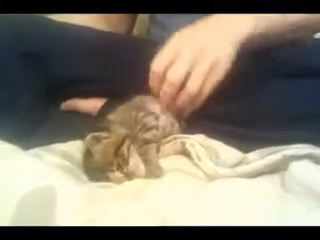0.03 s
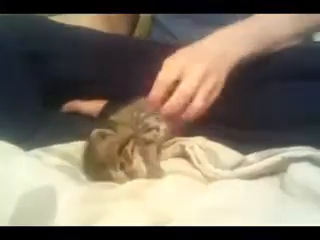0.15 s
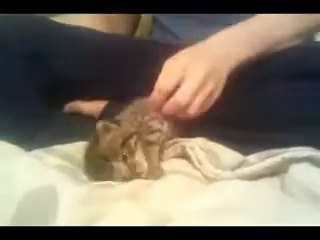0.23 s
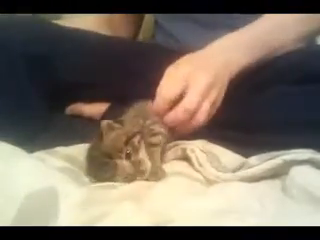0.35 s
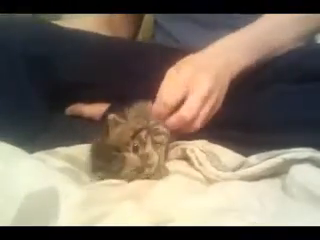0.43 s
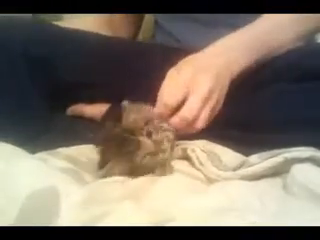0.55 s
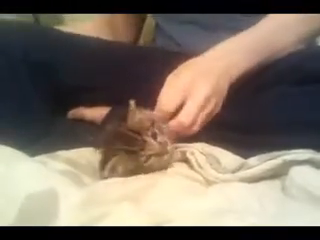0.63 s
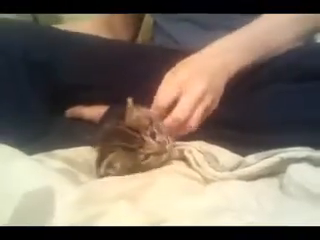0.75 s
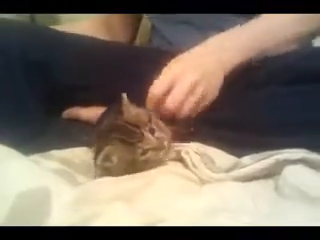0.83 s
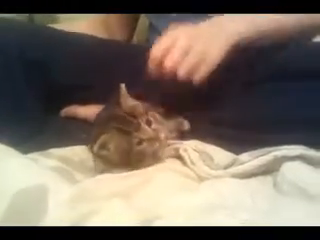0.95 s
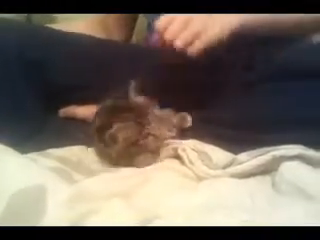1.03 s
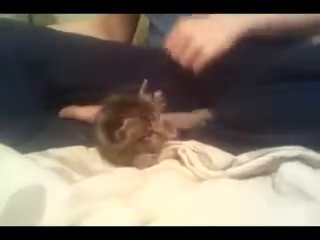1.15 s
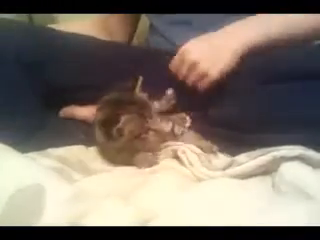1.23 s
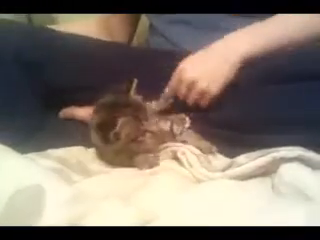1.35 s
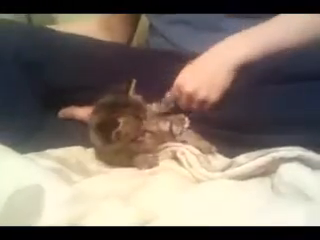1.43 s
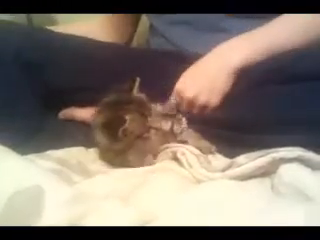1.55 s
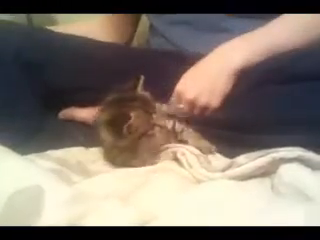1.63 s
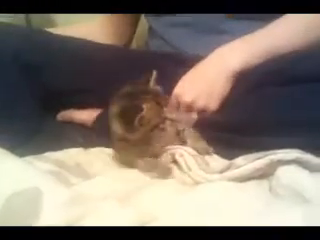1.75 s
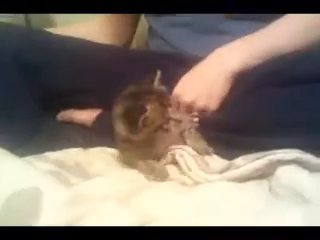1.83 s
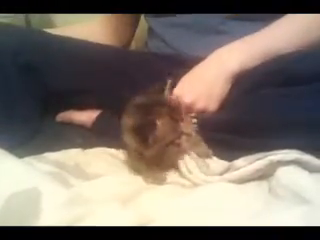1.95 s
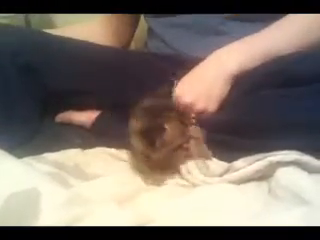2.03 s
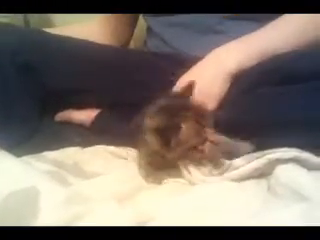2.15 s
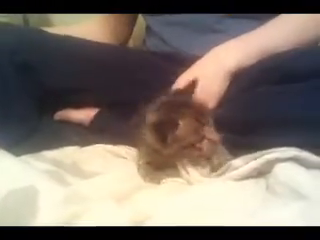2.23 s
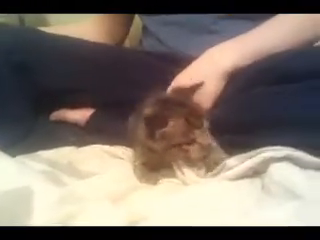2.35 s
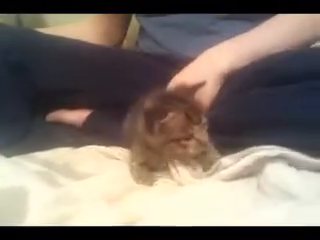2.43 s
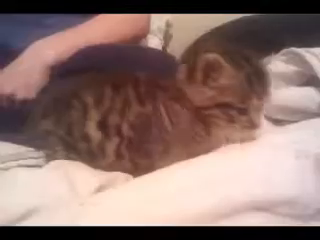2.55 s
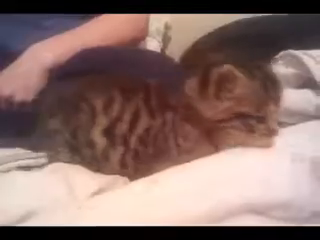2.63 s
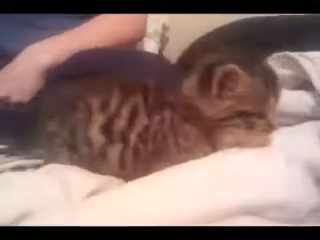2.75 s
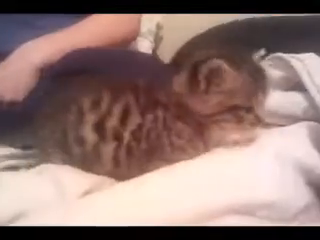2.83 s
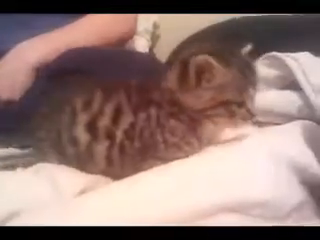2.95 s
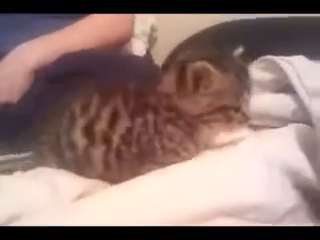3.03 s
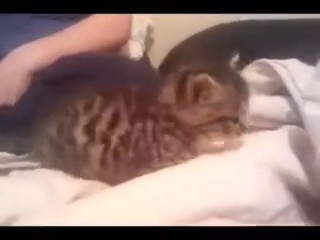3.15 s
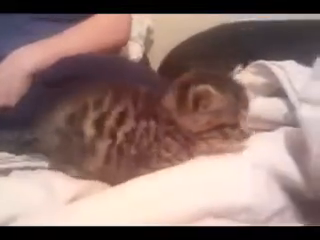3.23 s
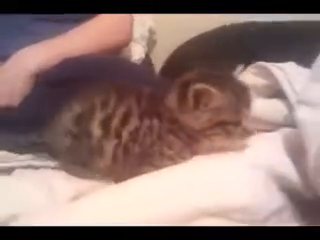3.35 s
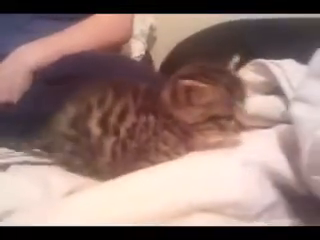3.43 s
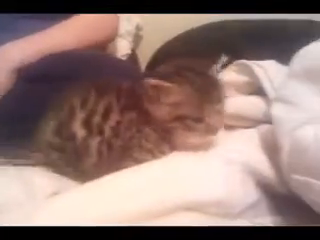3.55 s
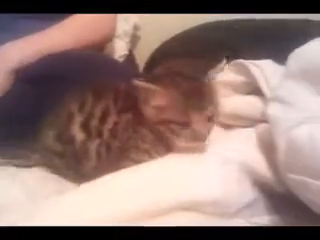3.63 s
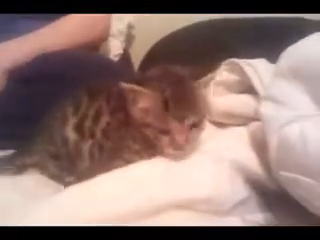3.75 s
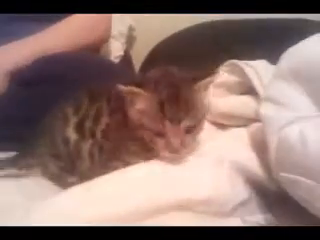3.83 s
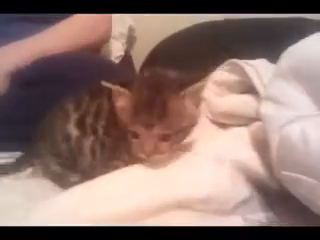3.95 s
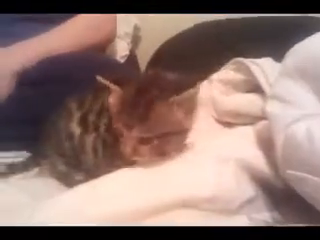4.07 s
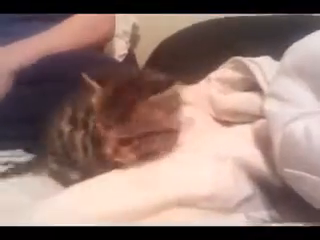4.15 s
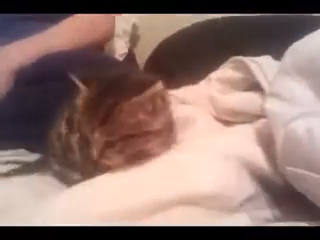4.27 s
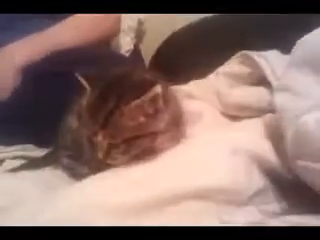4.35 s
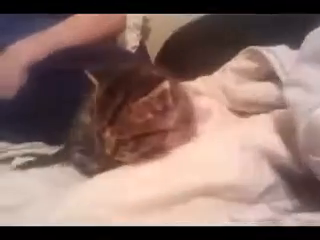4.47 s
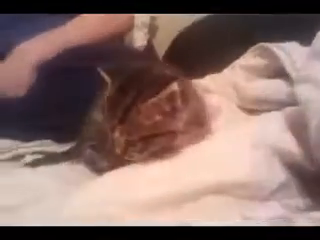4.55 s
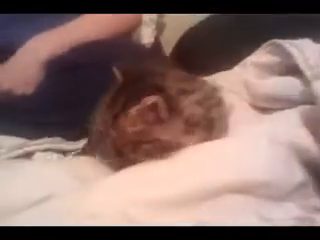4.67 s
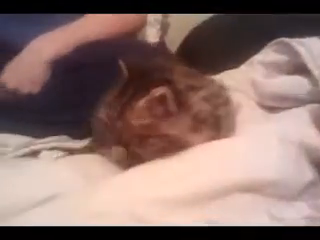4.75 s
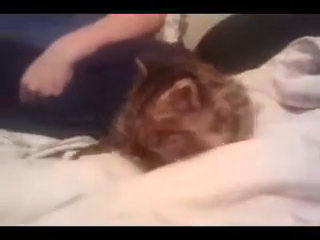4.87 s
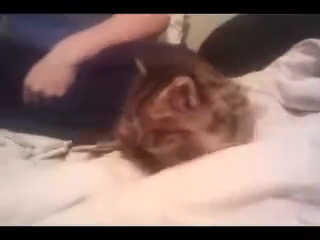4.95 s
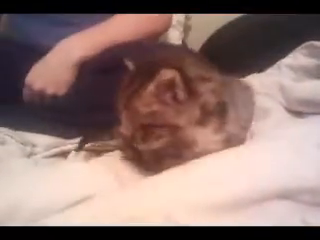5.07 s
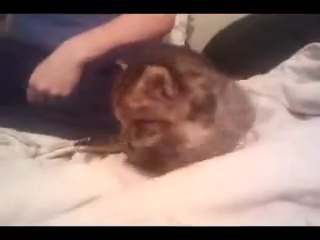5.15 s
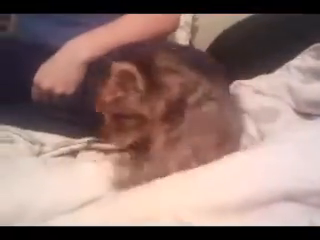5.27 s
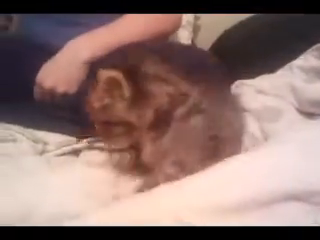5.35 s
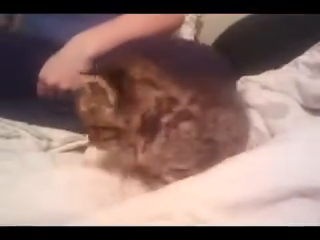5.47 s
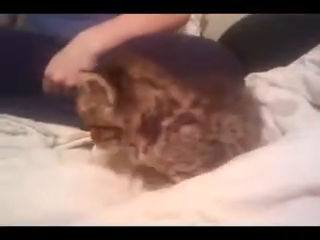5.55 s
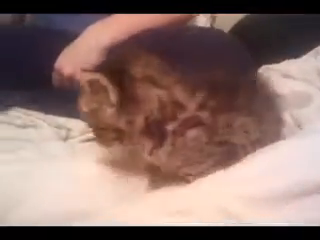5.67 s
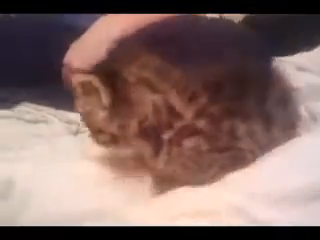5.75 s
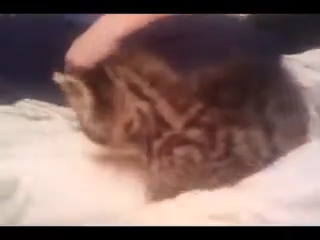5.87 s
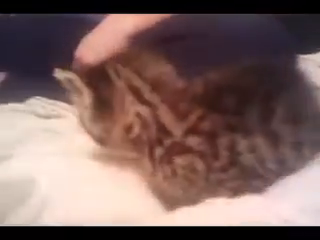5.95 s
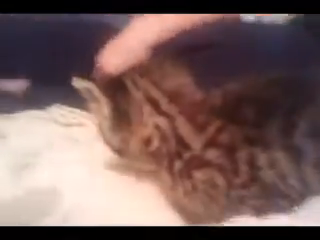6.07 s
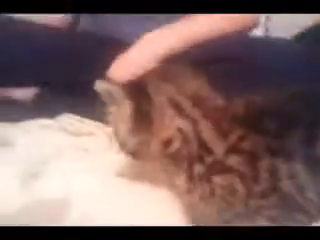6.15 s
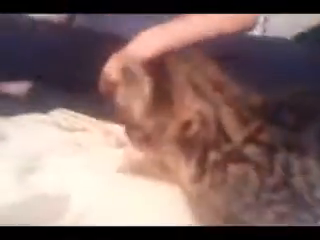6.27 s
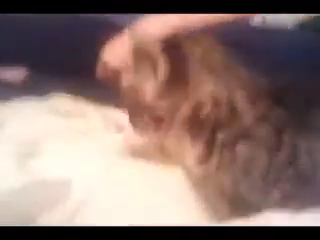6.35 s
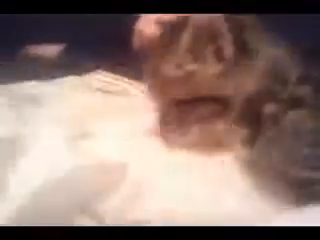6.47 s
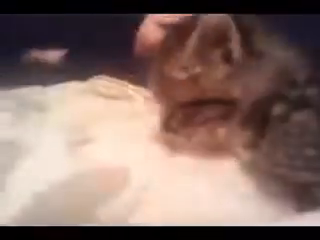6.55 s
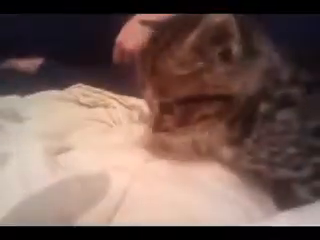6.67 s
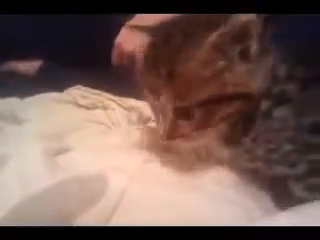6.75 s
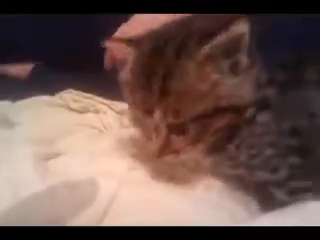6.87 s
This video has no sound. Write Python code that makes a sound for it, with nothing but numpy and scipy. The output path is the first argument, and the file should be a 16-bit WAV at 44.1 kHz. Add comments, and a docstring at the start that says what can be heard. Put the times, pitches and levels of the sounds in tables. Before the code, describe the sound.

A kitten gives one short meow and tiny squeaks amid faint bedding rustles, then something snaps sharply against the microphone.

```python
"""In a quiet room, a kitten on a blanket near a small camera gives a few tiny squeaks and one meow
that rises and falls. Its vocal folds buzz, and its throat and mouth shape the tone.
A hand strokes its fur, the bedding rustles and ticks, and paws pat the bed.
Near the end something snaps sharply against the camera and brushes over it.
Underneath lie hiss, a faint hum, the rumble of the swaying camera and one thin, bright click."""
import sys
import numpy as np
from scipy import signal
from scipy.fft import rfft, irfft, next_fast_len
from scipy.io import wavfile
from scipy.ndimage import map_coordinates

SR = 44100
rng = np.random.default_rng(int(sys.argv[2]) if len(sys.argv) > 2 else 0)


def to_wav(s):
    """Save 16-bit WAV."""
    ch = np.atleast_2d(s).T  # columns
    pcm = np.round(np.clip(ch, -1, 1) * 32767)  # PCM
    wavfile.write(sys.argv[1], SR, pcm.astype(np.int16))


N = 304579
TIME_S = np.arange(N) / SR
MIC_LIMIT_HZ = 7920


def amp(db):
    """Turn decibels into a number to multiply by."""
    return 10 ** (np.asarray(db) / 20)


def unit(x):
    """Scale a signal to an average strength (rms) of 1."""
    return x / np.sqrt(np.mean(x ** 2) + 1e-20)


def gain_db_at(tone, hz):
    """Read between the (frequency_hz, gain_db) rows of a table."""
    row_hz, row_db = np.transpose(tone)
    return np.interp(np.log(hz + 1), np.log(row_hz + 1), row_db)


def wobble(rate_hz, size=N):
    """A smooth curve through rate_hz random values a second."""
    values = rng.standard_normal(int(size * rate_hz / SR) + 4)
    return map_coordinates(values, [np.arange(size) * rate_hz / SR])


def swell(start_s, length_s, rise, fall):
    """Ease in, hold and ease out; rise and fall are shares of the length."""
    progress = (TIME_S - start_s) / length_s
    ramp = np.clip(np.minimum(progress / rise, (1 - progress) / fall), 0, 1)
    return np.sin(np.pi / 2 * ramp) ** 2


def lowpass(x, edge_hz):
    """Cut away everything above edge_hz."""
    padded = next_fast_len(N + 8192)
    hz = np.fft.rfftfreq(padded, 1 / SR)
    return irfft(rfft(x, padded) / np.sqrt(1 + (hz / edge_hz) ** 220), padded)[:N]


def noise(tone, size=N):
    """Noise of strength 1, shaped by a tone table and kept to the microphone's range."""
    padded = next_fast_len(size)
    hz = np.fft.rfftfreq(padded, 1 / SR)
    gain = amp(gain_db_at(tone, hz)) * (hz < MIC_LIMIT_HZ + 300)
    return unit(irfft(rfft(rng.standard_normal(padded)) * gain, padded)[:size])


def add(track, start_s, sound):
    """Mix a sound into the track at start_s."""
    part = track[max(round(start_s * SR), 0):][:len(sound)]
    part += sound[:len(part)]


# tone of the room and microphone noise: frequency_hz, gain_db
HISS_TONE = [(12, -40), (20, 3.5), (43, 1.5), (71, -1), (133, -1), (166, -4), (203, -4.5), (224, -5),
             (247, -4), (280, -4.5), (606, -10.5), (653, -11.5), (817, -13), (1520, -17.5), (7680, -21.5),
             (9980, -80.5), (16900, -120)]
# notes in the hum: pitch_hz, level_db
HUM_NOTES = [(100, -63), (131, -66), (199.8, -61), (249, -65.5)]
def hiss_and_hum(hiss_db=-50.5):
    """The room and microphone hiss steadily over a faint, wavering hum."""
    hum = sum(amp(db) * np.sin(2 * np.pi * hz * TIME_S + .5 * wobble(3)) for hz, db in HUM_NOTES)
    return amp(hiss_db) * noise(HISS_TONE) + np.sqrt(2) * hum


# moves of the camera: start_s, length_s, level_db
CAMERA_SWAYS = [(5.72, 0.35, -41.5), (6.177, .44, -47.5), (6.827, .11, -44)]
def camera_rumble():
    """The camera sways in the hand and makes a deep rumble."""
    sway = sum(amp(db) * swell(s, length, rise=.47, fall=.47) for s, length, db in CAMERA_SWAYS)
    return sway * noise([(5, -9), (18, 3), (32, -7), (60, -23), (200, -44), (1000, -79)])


def thin_click(at_s=2.2805, spike_db=-19.5, ring_hz=6500, ring_db=-36, fade_s=.0011):
    """One thin spike with a moment of bright ringing around it."""
    t = TIME_S - at_s
    out = amp(ring_db) * np.sin(2 * np.pi * ring_hz * t + wobble(6000)) * np.exp(-np.abs(t) / fade_s)
    out[round(at_s * SR)] += amp(spike_db)
    return out


# shifts of the kitten's weight: start_s, level_db, fade_s (time to drop by 60 dB)
WEIGHT_SHIFTS = [(3.455, -49.5, 0.24), (4.72, -49, 0.84), (4.97, -52.5, .8), (6.2, -51.5, 0.88)]
# tone of a rustle muffled by the filling: frequency_hz, gain_db
PADDING_TONE = [(100, -19), (300, -1.5), (450, 1.5), (750, 3.5), (1100, -14.5), (1800, -17), (4000, -39.5)]
def bedding_rustle(rise_s=.02, grain_db=3):
    """Padding gives way quickly under the kitten, then settles in uneven scuffs."""
    load = np.zeros(N)
    for start_s, level_db, fade_s in WEIGHT_SHIFTS:
        t = TIME_S - start_s
        load += np.clip(t / rise_s, 0, 1) * amp(level_db - 60 * np.maximum(t - rise_s, 0) / fade_s)
    return load * unit(amp(grain_db * wobble(120)) * noise(PADDING_TONE))


def soft_push(pitch_hz, fade_s):
    """A soft touch starts a wave that drops by 60 dB in fade_s; its peak is 1."""
    t = np.arange(SR // 8) / SR
    rise = 1 - np.exp(-(t * pitch_hz / .49) ** 2)
    push = -np.sin(2 * np.pi * pitch_hz * t) * amp(-60 * t / fade_s) * rise
    return push / np.abs(push).max()


# ticks of the bedding: start_s, peak_db, pitch_hz
FOLD_TICKS = [(.383, -41.5, 1100), (1.875, -38, 1150), (1.920, -40, 1000), (1.970, -35.5, 1050),
              (3.463, -38, 1000), (3.4776, -37, 850), (3.502, -35.5, 1220), (3.528, -40, 800),
              (5.004, -39, 800), (5.048, -32, 970), (5.108, -33.5, 1020), (5.180, -33.5, 970),
              (5.6986, -33, 1100), (5.779, -34.5, 1100), (5.867, -33, 1160), (6.215, -36, 950),
              (6.285, -38, 776)]
def bedding_ticks(fade_cycles=2.25):
    """Folds in the cloth give way, each with a tiny tick."""
    out = np.zeros(N)
    for start_s, peak_db, pitch_hz in FOLD_TICKS:
        add(out, start_s, amp(peak_db) * soft_push(pitch_hz, fade_cycles / pitch_hz))
    return out


# paws landing: start_s, peak_db, pitch_hz, fade_s
PAW_PATS = [(2.711, -46.5, 85.2, .06), (3.464, -38, 109, 0.032), (3.479, -33.5, 113, 0.073),
            (3.504, -44, 105, 0.054), (3.529, -39, 107, 0.065), (6.381, -38, 132, 0.025),
            (6.474, -36, 35, 0.04), (6.5385, -35, 126, 0.036)]
def paw_pats():
    """Paws push on the bed with low thuds that die away fast."""
    out = np.zeros(N)
    for start_s, peak_db, pitch_hz, fade_s in PAW_PATS:
        add(out, start_s, amp(peak_db) * soft_push(pitch_hz, fade_s))
    return out


# strokes over fur, cloth and camera: start_s, length_s, level_db, pressure_db (cloth relative to fur)
HAND_STROKES = [(-.02, 0.16, -56, -10), (0.113, 0.086, -50, -11), (0.699, 0.1, -45, -3),
                (0.782, 0.37, -47, -3.5), (0.866, 0.13, -45.5, -8), (0.973, 0.1, -44, -4.5),
                (1.38, .14, -61.5, -9), (1.99, .13, -61.5, -6), (3.149, 0.66, -66.5, 6.5),
                (5.676, 0.69, -62, 3.5), (5.812, 0.11, -62.5, 6), (6.126, 0.086, -58.5, 3),
                (6.237, 0.2, -59, 3.5), (6.273, 0.077, -51.5, -9), (6.426, .009, -42.5, -3),
                (6.446, 0.044, -40.5, -5), (6.463, 0.009, -40, -16), (6.472, 0.086, -46.5, -9),
                (6.8, .17, -63.5, 0.5)]
# tones of lightly brushed fur and of pressed cloth: frequency_hz, gain_db
FUR_TONE = [(1000, -37), (3000, -24), (4700, -5.5), (5600, 0), (6500, 4.5), (7900, -3.5)]
CLOTH_TONE = [(60, -12.5), (250, 4), (800, 0.5), (1500, -1), (2600, -1), (4200, -5), (6000, -19),
              (8000, -20)]
def stroking(grain_db=2):
    """Fibres slip in tiny bunches; pressing harder brings in the duller sound of the cloth."""
    fur_power, cloth_power = np.zeros((2, N))
    for start_s, length_s, level_db, pressure_db in HAND_STROKES:
        speed = amp(level_db) * swell(start_s, length_s, rise=.28, fall=.42)
        fur_power += speed ** 2
        cloth_power += (amp(pressure_db) * speed) ** 2
    grain = unit(amp(grain_db * wobble(700)))
    return grain * (np.sqrt(fur_power) * noise(FUR_TONE) + np.sqrt(cloth_power) * noise(CLOTH_TONE))


# sharp hits on the camera: start_s, level_db, ring_db, scratch_db (both added to level_db)
CAMERA_SNAPS = [(6.4341, -8.5, -1.5, -5.5), (6.4377, -12, -5.5, -9), (6.4402, -26, 1.5, -3),
                (6.457, -35, -10, 5), (6.4957, -22, -11, -1), (6.528, -26, -2.5, -2)]
# notes the camera case rings at: pitch_hz, gain_db, fade_s
CASE_NOTES = [(895, -18, 0.0073), (1670, -12.5, .004), (3870, -6, 0.0063), (5510, -8.5, 0.0066),
              (5830, 1.5, 0.0054), (7100, -14, 0.0037)]
# tone of a scratch on the case: frequency_hz, gain_db
SCRATCH_TONE = [(200, 13), (900, 0), (1900, -8), (3400, 1.5), (4400, -17), (6000, -26), (7200, 17.5),
                (7900, -9), (9000, -20)]
def camera_snaps(rise_s=.00017, scratch_fade_s=.0049):
    """Each hit rings the case for a few milliseconds and scratches its surface."""
    out, t = np.zeros(N), np.arange(SR // 30) / SR
    rise = 1 - np.exp(-(t / rise_s) ** 2)
    for start_s, level_db, ring_db, scratch_db in CAMERA_SNAPS:
        ring = rise * sum(amp(db + rng.normal(0, 1.5) - 60 * t / fade_s) * np.sin(2 * np.pi * hz * t)
                          for hz, db, fade_s in CASE_NOTES)
        ring /= np.abs(ring).max()
        scratch = .52 * rise * amp(-60 * t / scratch_fade_s) * noise(SCRATCH_TONE, len(t))
        add(out, start_s, amp(level_db) * (amp(ring_db) * ring + amp(scratch_db) * scratch))
    return out


# bumps on the camera: time_s, level_db, width_s, scrape_db
CAMERA_BUMPS = [(6.4724, -24, 0.00094, -31), (6.5358, -17.5, 0.0018, -20)]
def camera_bumps(release_s=.00036, scrape_early_s=.00057, scrape_width_s=.00095):
    """Pressure on the camera builds, slips off with a scrape and ebbs away."""
    out, scratch = np.zeros(N), noise(SCRATCH_TONE)
    for time_s, level_db, width_s, scrape_db in CAMERA_BUMPS:
        t = TIME_S - time_s
        out += amp(level_db) * np.tanh(t / release_s) * np.exp(-np.abs(t) / width_s)
        out += amp(scrape_db) * scratch * np.exp(-((t + scrape_early_s) / scrape_width_s) ** 2)
    return out


def room_echo(sound, fade_s=.25):
    """A softly furnished room throws back a short echo."""
    t = np.arange(SR // 3) / SR
    tail = rng.standard_normal(len(t)) * amp(-60 * t / fade_s) * (t > .004)
    return signal.fftconvolve(sound, tail / np.linalg.norm(tail))[:N]


# how the throat and mouth shape the voice: frequency_hz, gain_db
THROAT_TONE = [(400, -1.5), (850, 0), (950, 2.5), (1150, 6), (1380, 6.5), (1700, 5.5), (2000, -2),
               (2500, 1.5), (2850, 3), (3350, -12), (4200, 0.5), (4800, -4), (5800, -10), (7800, -18)]
# tone of the creak in a rough voice: frequency_hz, gain_db
CREAK_TONE = [(300, -24), (700, -8.5), (1050, 1), (1320, -4), (1700, -8), (2200, -13), (2800, -14.5),
              (4000, -29), (8000, -49)]
def kitten_voice(pitch_hz, roughness, slope_db, jitter=.049, flutter=.91, shimmer_db=1.5, creak=1.3):
    """Vocal folds buzz through the throat; roughness (0 to 1) makes them shake and creak."""
    size = len(pitch_hz)
    pitch_hz = pitch_hz * (1 + jitter * roughness * wobble(350, size) + .0032 * wobble(70, size))
    phase = 2 * np.pi * np.cumsum(pitch_hz) / SR
    buzz = np.zeros(size)
    for k in range(1, 9):  # the main note and its overtones, changing by slope_db each octave
        level_db = slope_db * np.log2(k) + gain_db_at(THROAT_TONE, k * pitch_hz)
        level_db += shimmer_db * np.log(k + .5) * wobble(45, size)
        tremble = 1 + flutter * roughness * wobble(600, size)
        buzz += amp(level_db) * tremble * np.sin(k * phase)
    # the folds close raggedly, making one puff of noise each cycle
    puffs = (1 + np.cos(phase)) * noise(CREAK_TONE, size)
    return np.sqrt(2) * buzz + creak * roughness ** 2 * puffs


# tiny squeaks: start_s, length_s, start_hz, end_hz, level_db, roughness, slope_db (per octave)
KITTEN_SQUEAKS = [(.218, 0.035, 894, 624, -61, .2, -9), (0.254, 0.051, 727, 586, -61.5, 0.1, -5.5),
                  (0.313, 0.026, 1043, 1210, -55, 0.15, -16), (.356, 0.03, 1034, 1120, -64, .1, -20),
                  (4.722, 0.028, 490, 423, -45.5, 0.2, -14.5), (4.731, 0.0567, 536, 419, -42, 0.04, -18),
                  (4.992, 0.04, 386, 347, -48, 0.35, -22)]
def squeaks():
    """The voice slides briefly up or down with the mouth nearly shut."""
    out = np.zeros(N)
    for start_s, length_s, start_hz, end_hz, level_db, roughness, slope_db in KITTEN_SQUEAKS:
        size = int(length_s * SR)
        voice = kitten_voice(np.linspace(start_hz, end_hz, size), roughness, slope_db)
        add(out, start_s, amp(level_db) * signal.windows.tukey(size, .6) * voice)
    return out


# the rise and fall of the meow: time_s, pitch_hz
MEOW_TUNE = [(2.735, 519.7), (2.747, 607), (2.767, 668), (2.785, 718.5), (2.823, 805), (2.839, 805),
             (2.869, 848), (2.927, 809), (2.955, 828.6), (2.985, 786.1), (3.059, 754.3), (3.127, 685.3),
             (3.173, 605), (3.255, 429.5)]
def meow(start_s=2.723, end_s=3.262, rise_s=.021, fall_s=.012, settle_s=.019,
         base_db=-41, effort_db_per_octave=7, tiring_db_per_s=14, rattle_s=3.241, rattle_width_s=.006):
    """One call, louder when higher and weaker as the air runs out, creaky at both ends."""
    call = slice(round(start_s * SR), round(end_s * SR))
    pitch_hz = np.interp(TIME_S[call], *np.transpose(MEOW_TUNE))
    t = np.arange(len(pitch_hz)) / SR
    octaves_down = np.log2(pitch_hz.max() / pitch_hz)
    rattle = np.exp(-((start_s + t - rattle_s) / rattle_width_s) ** 2)  # the vocal folds let go
    level_db = base_db - effort_db_per_octave * octaves_down - tiring_db_per_s * t + 4.5 * rattle
    fade = np.clip(np.minimum(t / rise_s, (t[-1] - t) / fall_s), 0, 1)
    unsettled = np.exp(-(t / settle_s) ** 4)
    strain = .1 * np.exp(-octaves_down / .08)  # a little rougher near the top note
    roughness = np.clip(.04 + unsettled + strain + .75 * rattle, 0, 1)
    slope_db = -9 + 5 * t  # the sound brightens as the mouth opens
    out = np.zeros(N)
    out[call] = fade * amp(level_db) * kitten_voice(pitch_hz, roughness, slope_db)
    return out


def scene(echo_db=-18.5):
    """Mix the background, blanket, camera and kitten; only the voice gets an echo."""
    background = hiss_and_hum() + camera_rumble()
    blanket = bedding_rustle() + bedding_ticks() + paw_pats() + stroking()
    camera = camera_snaps() + camera_bumps()
    voice = squeaks() + meow()
    return (background + blanket + camera + voice + amp(echo_db) * room_echo(voice))[None]


def record(dry):
    """The microphone loses the highest sounds; the thin click joins later and stays bright."""
    heard = lowpass(dry[0], MIC_LIMIT_HZ)
    return lowpass(heard + thin_click(), edge_hz=16200)[None]


dry = scene()
out = record(dry)
to_wav(out)
```